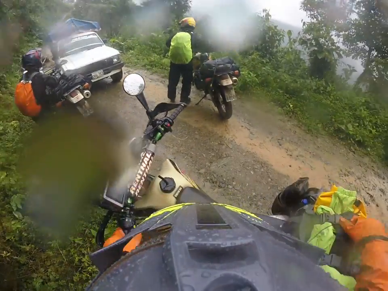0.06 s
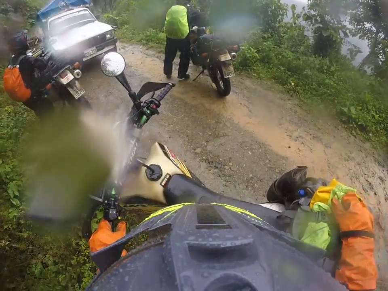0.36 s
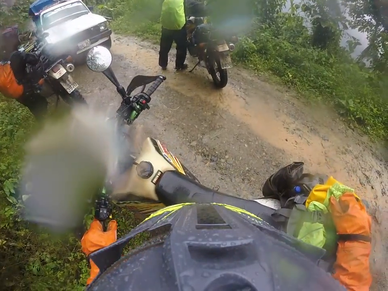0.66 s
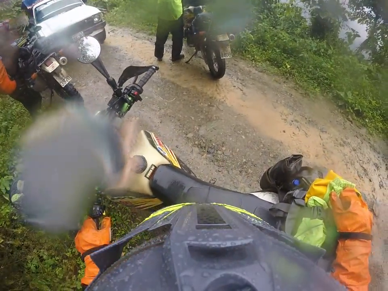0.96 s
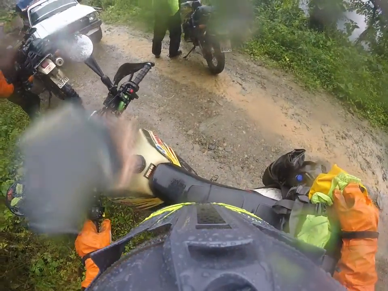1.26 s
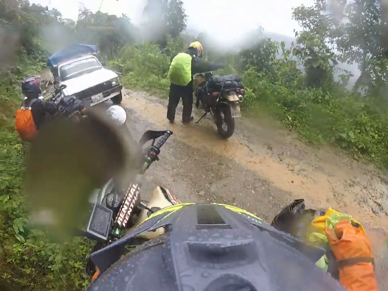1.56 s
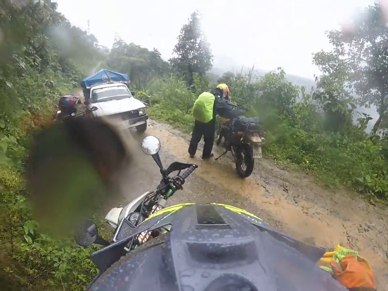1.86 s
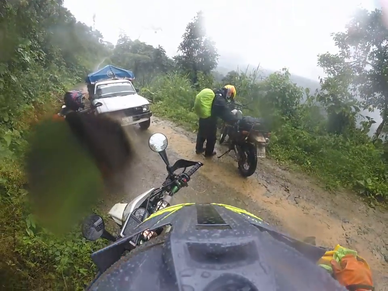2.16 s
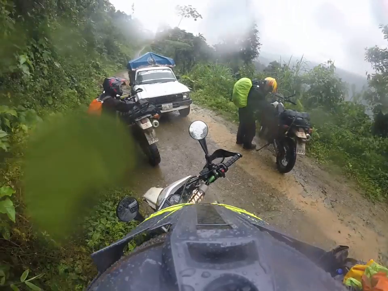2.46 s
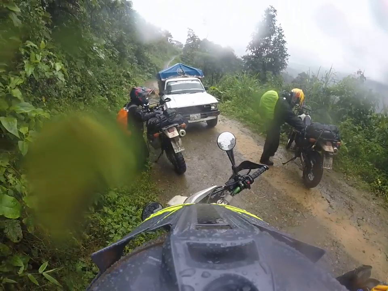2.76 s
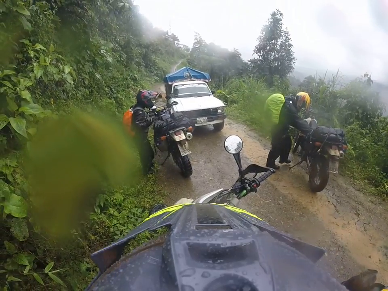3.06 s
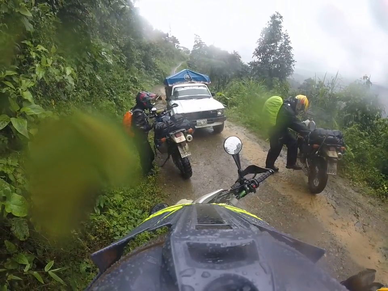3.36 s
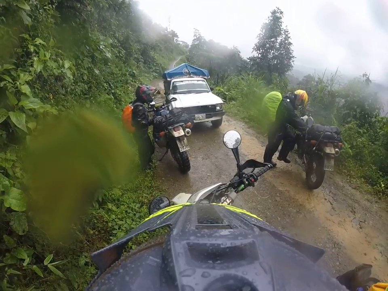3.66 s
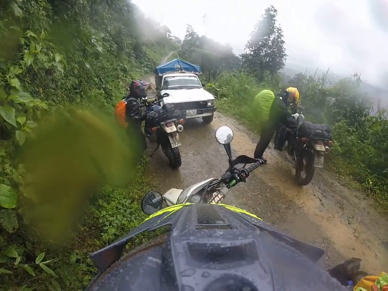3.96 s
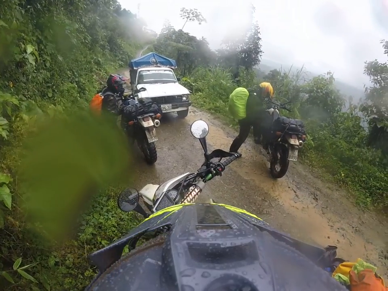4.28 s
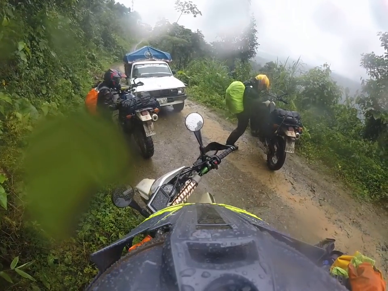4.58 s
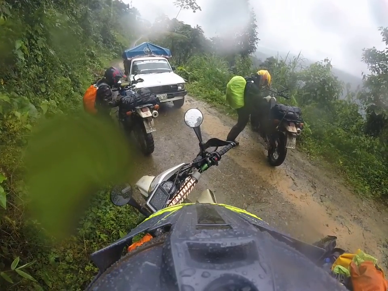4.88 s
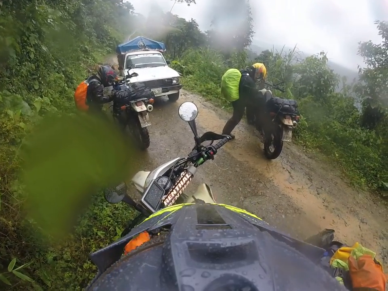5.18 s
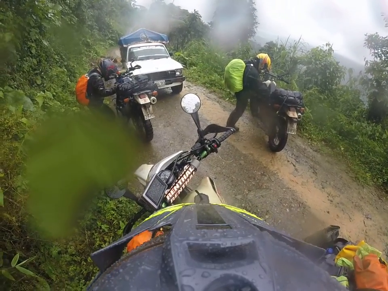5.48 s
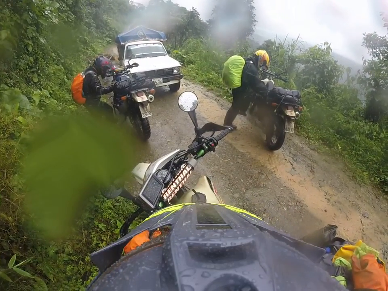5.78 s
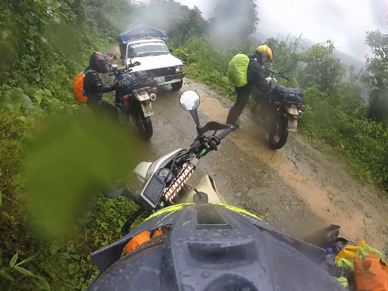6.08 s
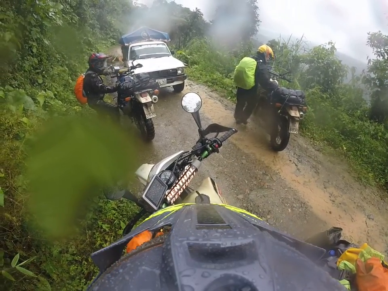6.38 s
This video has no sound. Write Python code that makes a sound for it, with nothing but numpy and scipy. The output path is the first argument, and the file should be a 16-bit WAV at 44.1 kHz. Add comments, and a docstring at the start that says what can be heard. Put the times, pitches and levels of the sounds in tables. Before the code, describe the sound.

Raindrops tap close on a helmet and camera over steady rain hiss and a faint idling engine, with a quick double metal clack midway.

```python
"""Steady rain on a forest road, heard from a camera on a rider's helmet. From the start, rain hisses
on the leaves over a low idling engine, small drops patter all round, big ones tap on the camera case
and some make the hollow of the helmet ring. At 0.2 s the helmet takes one soft bump. From 2.5 s a few
drops ring the visor, and near 3.4 s a metal motorbike part clacks twice. The hardest taps come near
4.7 s, and the rain goes on to the end."""
import sys
import numpy as np
from scipy import signal
from scipy.fft import rfft, irfft, next_fast_len
from scipy.io import wavfile
from scipy.ndimage import uniform_filter1d, map_coordinates

SR = 44100
rng = np.random.default_rng(int(sys.argv[2]) if len(sys.argv) > 2 else 0)


def transcribe(signal):
    """Save signal, clipped to [-1, 1], as a 16-bit WAV file at the path in sys.argv[1]."""
    frames = np.atleast_2d(signal).T
    limited = np.clip(frames, -1, 1)
    pcm = np.round(limited * 32767).astype(np.int16)
    wavfile.write(sys.argv[1], SR, pcm)


N = 287971
SHORT = 2048  # samples in one drop's sound
SHORT_TIME, SHORT_HZ = np.arange(SHORT) / SR, np.fft.rfftfreq(SHORT, 1 / SR)
VARY_DB = 2.5  # how much a ringing tone's strength varies from hit to hit


def amp(db):
    """Turns decibels into a gain."""
    return 10 ** (np.asarray(db) / 20)


def unit(x):
    """Scales a signal to an average strength (rms) of 1."""
    return x / np.sqrt(np.mean(x ** 2) + 1e-20)


def burst(spectrum):
    """Turns a spectrum into a short sound with the energy of 10 ms at rms 1."""
    x = irfft(spectrum, SHORT)
    return x * np.sqrt(SR * .01 / (np.sum(x ** 2, axis=-1, keepdims=True) + 1e-30))


def gain_at(points, hz):
    """Reads gains off a curve through (f/Hz, level/dB) points."""
    f, db = np.transpose(points)
    return amp(np.interp(np.log(hz + 1), np.log(f + 1), db))


def wobble(rate):
    """A smooth curve through `rate` random values a second."""
    return map_coordinates(rng.standard_normal(int(N * rate / SR) + 4), [np.arange(N) * rate / SR])


def add(track, s, sound):
    """Mixes a sound into the track at s seconds."""
    part = track[max(round(s * SR), 0):][:len(sound)]
    part += sound[:len(part)]


def passband(kind, hz, order):
    """A filter curve that lets the "high" or the "low" side of hz through."""
    return signal.freqz(*signal.butter(order, hz, kind, fs=SR), SHORT_HZ, fs=SR)[1]


def resonate(tones, weights):
    """The spectrum of a part's own ringing tones, with one row of weights for each drop."""
    f = SHORT_HZ
    peaks = [amp(db) * 1j * f * width / (hz * hz - f * f + 1j * f * width) for hz, width, db in tones]
    return weights @ np.array(peaks)


def struck_near(tones, pitch_hz, spread_octaves=0.26):
    """Where a drop lands decides which tones ring: mostly those near its pitch."""
    away = np.log2(np.array(tones)[:, 0] / pitch_hz[:, None]) / spread_octaves
    return resonate(tones, np.exp(-away ** 2 / 2) * amp(VARY_DB * rng.standard_normal(away.shape)))


def ring(tones, attack_s, detune, vary_db=VARY_DB):
    """A struck part rings, with peak 1; each tone dies by 60 dB in its fade time, t60."""
    t = np.arange(SR // 2) / SR
    tune = 1 + detune * rng.normal()
    x = np.zeros(len(t))
    for hz, db, t60 in tones:
        fade = amp(db + vary_db * rng.normal() - 60 * t / t60)
        x += fade * np.sin(2 * np.pi * (hz * tune * t + rng.random()))
    x *= 1 - np.exp(-t / attack_s)
    return x / np.abs(x).max()


def rush(colour, patchy_db):
    """Noise of rms 1 in the given tone colour, with random louder and softer patches."""
    noise = signal.stft(rng.standard_normal(N + SHORT), nperseg=512)[2]
    patches = uniform_filter1d(rng.standard_normal(noise.shape), size=6, axis=0)
    patches = uniform_filter1d(patches, size=6, axis=1)
    x = signal.istft(noise * amp(patchy_db * unit(patches)), nperseg=512)[1]
    m = next_fast_len(len(x))
    return unit(irfft(rfft(x, m) * gain_at(colour, np.fft.rfftfreq(m, 1 / SR)), m)[:N])


# tone colour of the far rain: f/Hz, level/dB
RAIN_COLOUR = [(40, 6.5), (90, 4), (170, 4.5), (230, 1.5), (330, 0.5), (500, -2.5), (620, -2), (1200, -5.5),
               (1800, -6), (2200, -10.5), (2550, -9), (3300, -14), (5100, -17.5), (8000, -24.5),
               (12000, -31), (15000, -40.5)]
def far_rain(level_db=-54):
    """Countless drops on leaves and road blur into a hiss."""
    return amp(level_db) * rush(RAIN_COLOUR, patchy_db=1.5)


# the engine's tones: multiple of the firing rate, level/dB
ENGINE_TONES = [(1, 5), (2, -11), (3, -15), (4, 7)]
# tone colour of the rumble: f/Hz, level/dB
RUMBLE_COLOUR = [(8, 13), (18, 2), (38, 7), (60, -6), (110, -16), (400, -37), (1500, -90)]
# how engine and rumble swell and sink together: t/s, level/dB
ENGINE_SWELL = [(0.0, -56.5), (1.09, -72.5), (1.71, -55.5), (2.0, -66.5), (5.53, -74), (6.18, -80),
                (6.53, -64)]
def idling_engine(firing_hz=37.4, throb_db=-3.5, rumble_db=1):
    """An engine fires a little unevenly and throbs inside a low rumble."""
    swell_db = np.interp(np.arange(N) / SR, *np.transpose(ENGINE_SWELL))
    firings = np.cumsum(firing_hz * (1 + 0.0493 * wobble(3.3))) / SR
    throb = sum(amp(db + 7.9 * wobble(6.2)) * np.sin(2 * np.pi * (k * firings + rng.random()))
                for k, db in ENGINE_TONES)
    rumble = rush(RUMBLE_COLOUR, patchy_db=-2)
    return amp(swell_db) * (amp(throb_db) * unit(throb) + amp(rumble_db) * rumble)


# a soft knock on the helmet: t/s, level/dB
BUMP_HITS = [(0.21, -42)]
# tones of the camera mount: f/Hz, level/dB, fade/s
MOUNT_TONES = [(37.7, -14, .5), (70.4, 0, 0.23), (117, 1, 0.11), (236, -32, 0.013)]
def helmet_bump():
    """A knock passes through the helmet and shakes the camera mount."""
    out = np.zeros(N)
    for s, db in BUMP_HITS:
        add(out, s, amp(db) * ring(MOUNT_TONES, attack_s=0.0072, detune=.01))
    return out


# drops that ring the helmet's hollow: t/s, level/dB
HOLLOW_DROPS = [(0.38, -42.5), (0.55, -42.5), (0.904, -39), (2.05, -35), (2.755, -39), (3.884, -40.5),
                (4.195, -40.5), (4.914, -35.5), (5.789, -34), (5.908, -42.5), (5.974, -34.5)]
# tones of that hollow: f/Hz, level/dB, fade/s
HOLLOW_TONES = [(391, -1.5, 0.064), (486, -18.5, 0.036), (262, -25.5, 0.11)]
def helmet_hollow(small_db=-45, range_db=14, count=130):
    """A few big drops and many small random ones ring the hollow under the helmet's shell."""
    out = np.zeros(N)
    for s, db in HOLLOW_DROPS:
        add(out, s, amp(db) * ring(HOLLOW_TONES, attack_s=0.0036, detune=0.035))
    for when, smallness in rng.random((count, 2)):
        db = small_db - range_db * np.sqrt(smallness)
        add(out, when * N / SR, amp(db) * ring(HOLLOW_TONES, attack_s=0.0074, detune=0.011))
    return out


# drops on the visor: t/s, level/dB, f/Hz
VISOR_DROPS = [(2.5225, -28.5, 955), (2.625, -40, 810), (3.662, -39, 745), (4.1265, -32, 965)]
def visor(t60=0.043):
    """A drop sets the visor ringing briefly with three close tones."""
    out = np.zeros(N)
    for s, db, hz in VISOR_DROPS:
        tones = [(hz, 0, t60), (0.853 * hz, -7, t60), (0.935 * hz, -7, t60)]
        add(out, s, amp(db) * ring(tones, attack_s=0.00046, detune=.002))
    return out


# clacks of a metal bike part: t/s, level/dB
CLACK_HITS = [(3.3537, -17), (3.406, -22.5)]
# tones of that part: f/Hz, level/dB, fade/s
METAL_TONES = [(877, -3.5, 0.14), (960, -3.5, .09), (1116, -2, 0.12), (1610, -11, .07), (2020, -5, 0.059),
               (2970, 1, 0.038), (3460, 1, 0.066), (4460, -8, .05), (4550, 4, 0.03), (4900, 10.5, 0.029),
               (5200, -6, .05), (6520, -8, 0.058)]
# tone colour of its scrape: f/Hz, level/dB
SCRAPE_COLOUR = [(400, -32), (850, 10.5), (2000, 3.5), (3900, -10), (4500, 8), (5000, -1), (5700, -5.5),
                 (6700, -5), (8700, -11.5), (10000, -22), (11400, -16), (15500, -35)]
def bike_clacks(ring_db=-4, scrape_db=-9, scrape_t60=0.02, rattle_db=-17, rattle_t60=0.19):
    """Metal snaps against its stop: a gritty scrape, ringing tones and a short rattle."""
    out, t = np.zeros(N), np.arange(SR // 2) / SR
    grit = rush(SCRAPE_COLOUR, patchy_db=7.5)
    for s, db in CLACK_HITS:
        fade = amp(scrape_db - 60 * t / scrape_t60) + amp(rattle_db - 60 * t / rattle_t60)
        ringing = amp(ring_db) * ring(METAL_TONES, attack_s=0.00054, detune=0.0026, vary_db=1.5)
        add(out, s, amp(db) * (ringing + fade * grit[round(s * SR):][:len(t)]))
    return out


# tone colour of a splash: f/Hz, level/dB
SPLASH_COLOUR = [(2500, -36.5), (3400, 3.5), (4000, -3.5), (4700, -5), (5500, -1), (6500, -7.5),
                 (8300, -15), (11500, -21), (15500, -32)]
def splashes(count, t60, spray):
    """Each drop bursts with a sharp tick, then a brief spray."""
    force = spray * rng.standard_normal((count, SHORT)) * amp(-60 * SHORT_TIME / t60)
    force[:, 0] += 1  # the tick
    # fold the filter so that nothing sounds before the drop lands
    cepstrum = irfft(np.log(gain_at(SPLASH_COLOUR, SHORT_HZ)))
    cepstrum[1:SHORT // 2] *= 2
    cepstrum[SHORT // 2 + 1:] = 0
    return burst(rfft(force) * np.exp(rfft(cepstrum)))


def through_shell(sounds, t60):
    """Each drop's sound takes its own paths through the helmet's shell, which smear it."""
    paths = rng.standard_normal(sounds.shape) * amp(-60 * SHORT_TIME / t60)
    return burst(rfft(sounds) * rfft(paths))


# tones of the helmet's shell: f/Hz, width/Hz, level/dB
SHELL_TONES = [(1160, 610, -16), (1520, 200, 14), (1727, 130, 3.5), (1870, 180, 3.5), (2432, 330, 3),
               (2950, 160, -9)]
def shell_ticks(pitch_hz):
    """Drops strike the shell with dull ticks, one for each pitch."""
    contact = passband("high", 1050, order=2) * passband("low", 2670, order=3)
    return through_shell(burst(struck_near(SHELL_TONES, pitch_hz) * contact), t60=0.014)


# big drops farther off, on the shell: t/s, level/dB, f/Hz
BIG_SHELL_DROPS = [(0.778, -44, 1960), (0.9633, -42.5, 2000), (1.3369, -46, 1880), (1.8726, -45, 2160),
                   (2.05, -44, 1900), (2.2217, -35.5, 1970), (2.6735, -44, 1790), (3.786, -44.5, 2220),
                   (3.884, -44.5, 1670), (4.113, -39.5, 1830), (4.169, -41.5, 1950), (4.844, -44, 1690),
                   (4.9144, -37.5, 1820), (4.9163, -34.5, 2060), (4.9632, -43, 2040), (5.0631, -41, 1560),
                   (5.749, -39, 2270), (5.788, -41, 1450)]
def patter(top_db=-46, range_db=20, rarity=0.67, splash_db=-22, splash_vary_db=5, count=500):
    """Drops on helmet and jacket: a few big ones over a random shower of mostly small ones."""
    shower_db = top_db - range_db * np.linspace(0, 1, count) ** rarity
    shower = np.column_stack([rng.uniform(0, N / SR, count), shower_db, rng.uniform(1510, 2550, count)])
    times, level_db, pitch_hz = np.vstack([BIG_SHELL_DROPS, shower]).T
    wetness = amp(splash_db + splash_vary_db * rng.standard_normal((len(times), 1)))
    sounds = shell_ticks(pitch_hz) + wetness * splashes(len(times), t60=0.003, spray=0.48)
    out = np.zeros(N)
    for s, db, sound in zip(times, level_db, sounds):
        add(out, s, amp(db) * sound)
    return out


# big drops on the camera case: t/s, level/dB, f/Hz, wall tap above panel ring/dB
CASE_DROPS = [(0.0626, -46.5, 2200, 2), (0.093, -42, 2550, -16), (0.2082, -44, 1950, 5),
              (0.287, -38, 2480, 0), (0.3276, -41, 2220, -5), (0.3829, -38.5, 2200, -12),
              (0.551, -34.5, 3100, -10), (0.552, -26.5, 1980, -2.5), (0.8513, -21, 2600, -8),
              (0.9063, -32, 2310, -21), (0.9444, -39, 2300, -1), (0.9963, -27, 1980, 0),
              (1.0088, -39.5, 1950, 1), (1.1501, -37, 2070, -5), (1.1597, -42, 2100, -3),
              (1.3873, -49, 1960, -2), (1.424, -49.5, 2320, 7), (1.5584, -41, 2120, -3),
              (1.7313, -39.5, 1730, 1), (1.971, -40.5, 2300, -6), (2.103, -44.5, 2300, -2),
              (2.25, -42, 2200, -3), (2.301, -35, 2040, 3), (2.3085, -27, 1920, 3),
              (2.3547, -29.5, 2470, -3.5), (2.3657, -34.5, 2570, -3.5), (2.5223, -33.5, 2480, -8),
              (2.6246, -47, 2300, -2), (2.7559, -40, 2960, -8), (2.7827, -44.5, 2330, -8.5),
              (2.9807, -25.5, 2130, -2.5), (3.1581, -48.5, 2400, -10), (3.2283, -28, 2100, 1),
              (3.65, -22.5, 2160, -5), (3.9559, -35, 2150, -6), (4.1263, -41.5, 2260, -10),
              (4.179, -31, 2350, 3), (4.4496, -34.5, 2180, -7), (4.6161, -19.5, 2120, 6.5),
              (4.7146, -38.5, 2450, -8), (4.7271, -18.5, 1930, 0.5), (4.822, -40.5, 2060, 6),
              (5.1645, -40.5, 2040, -11), (5.3974, -36.5, 2290, -3.5), (5.7188, -47, 2040, -7),
              (5.7946, -24, 2130, -1), (5.9769, -35.5, 2370, -1.5), (6.1076, -36.5, 2730, -4),
              (6.152, -39.5, 2270, 6.5)]
# tones of the case wall bending as a whole: f/Hz, width/Hz, level/dB
WALL_TONES = [(897, 80, -16.5), (1137, 253, 3.5)]
# tones of its stiffer panels: f/Hz, width/Hz, level/dB
PANEL_TONES = [(1770, 480, 11), (2073, 350, 9.5), (2240, 320, -9.5), (2640, 420, 18), (3134, 670, 26)]
# drops heavy enough to jolt the case: t/s, level/dB
CASE_JOLTS = [(0.207, -44.5), (0.8508, -43), (1.148, -44), (5.3988, -45.5), (5.9751, -44)]
def case_drops(ring_db=1, thud_db=-26, shell_db=-19, far_db=-56, lead_s=.0001):
    """Each big drop bends the case wall, rings its panels and bursts; the shell answers faintly."""
    times, level_db, pitch_hz, wall_db = np.transpose(CASE_DROPS)
    panel_db = level_db - 10 * np.log10(1 + amp(wall_db) ** 2)  # wall and panels share the energy
    # a splash grows more slowly than its tap, and is stronger on the small, high-pitched panels
    splash_db = -45 + 0.65 * (level_db + 30) + 22.5 * np.log2(pitch_hz / 2100)
    # one soft inward push starts all tones in step, leaving a dip between the wall's and the panels'
    contact = -passband("high", 1290, order=2) * passband("low", 1906, order=3)
    wall_weights = amp(VARY_DB * rng.standard_normal((len(times), len(WALL_TONES))))
    taps = burst(resonate(WALL_TONES, wall_weights) * contact)
    rings = burst(struck_near(PANEL_TONES, pitch_hz) * contact)
    # a faint splash landed far from the microphone, so more of its ring comes through the shell
    far_share = 1 / (1 + amp(splash_db - far_db)[:, None])
    rings = np.sqrt(1 - far_share) * rings + np.sqrt(far_share) * shell_ticks(pitch_hz)
    rings += amp(shell_db) * through_shell(rings, t60=0.034)
    thud = burst(-passband("low", 540, order=2) * passband("high", 100, order=1))  # the drop's weight
    sounds = (amp(panel_db + wall_db)[:, None] * (taps + amp(thud_db) * thud)
              + amp(panel_db + ring_db)[:, None] * rings
              + amp(splash_db)[:, None] * splashes(len(times), t60=0.0051, spray=0.49))
    out = np.zeros(N)
    for s, sound in zip(times, sounds):
        add(out, s - lead_s, sound)
    for s, db in CASE_JOLTS:
        add(out, s, amp(db) * thud)
    return out


def scene():
    """All the sounds meet at one microphone."""
    near_drops = case_drops() + patter() + helmet_hollow() + visor()
    return (near_drops + helmet_bump() + bike_clacks() + far_rain() + idling_engine())[None]


def record(dry):
    """The camera cuts off the very highest treble."""
    top_hz = 16300
    m = next_fast_len(N + SHORT)
    treble_cut = 1 / (1 + (np.fft.rfftfreq(m, 1 / SR) / top_hz) ** 120)
    return irfft(rfft(dry, m) * treble_cut, m)[..., :N]


dry = scene()
out = record(dry)
transcribe(out)
```